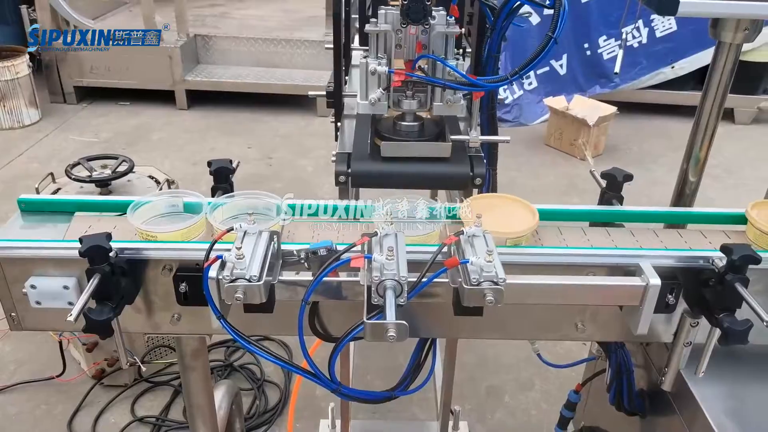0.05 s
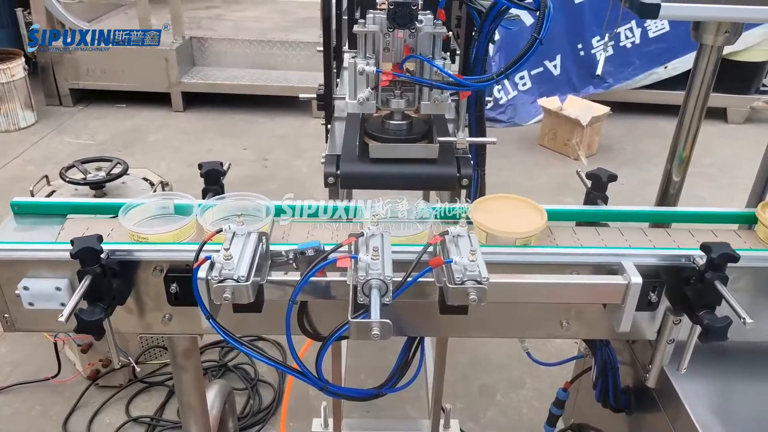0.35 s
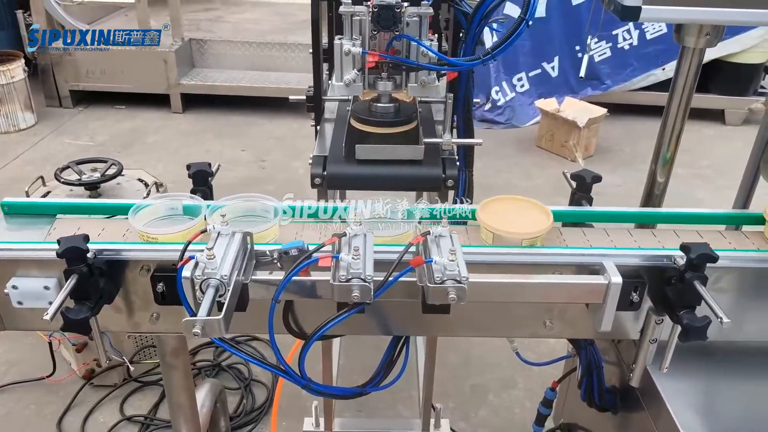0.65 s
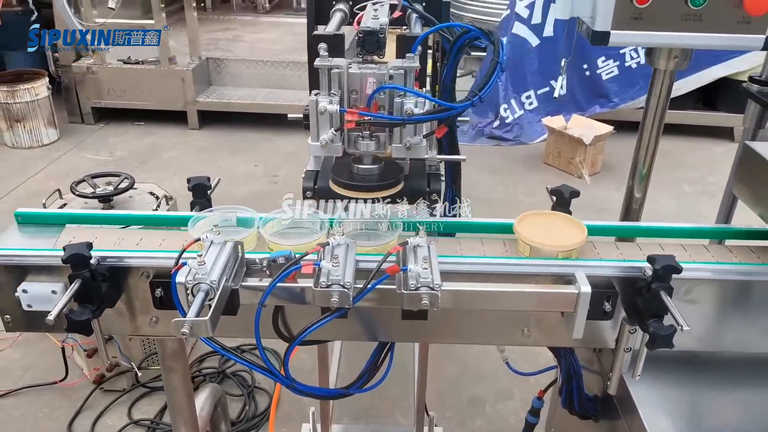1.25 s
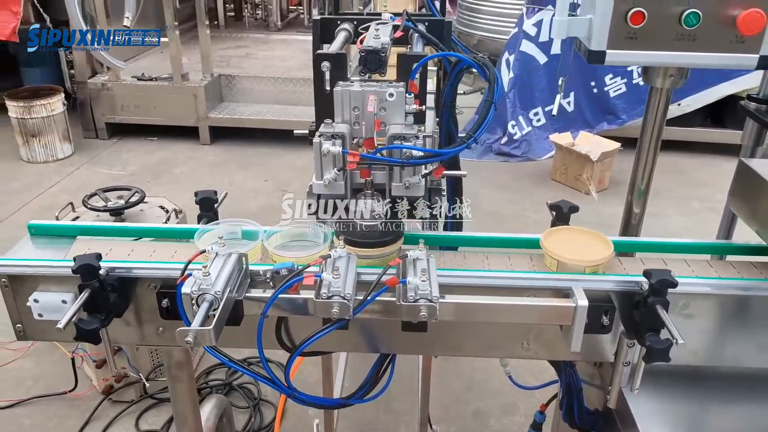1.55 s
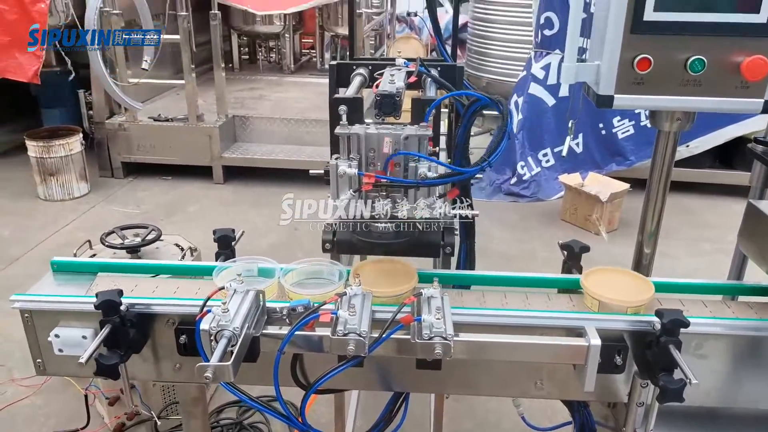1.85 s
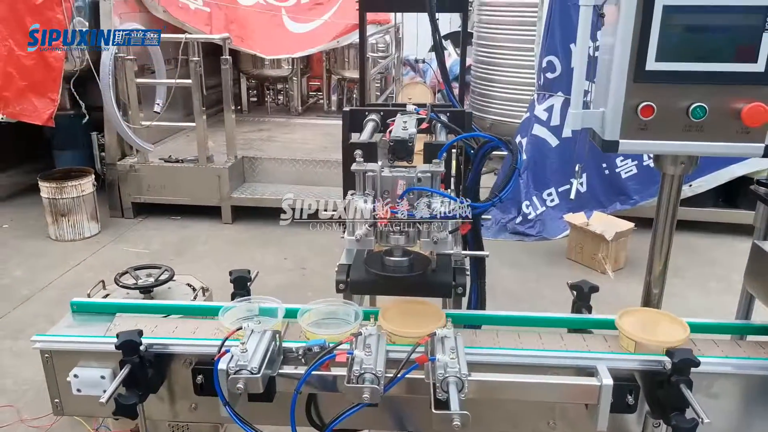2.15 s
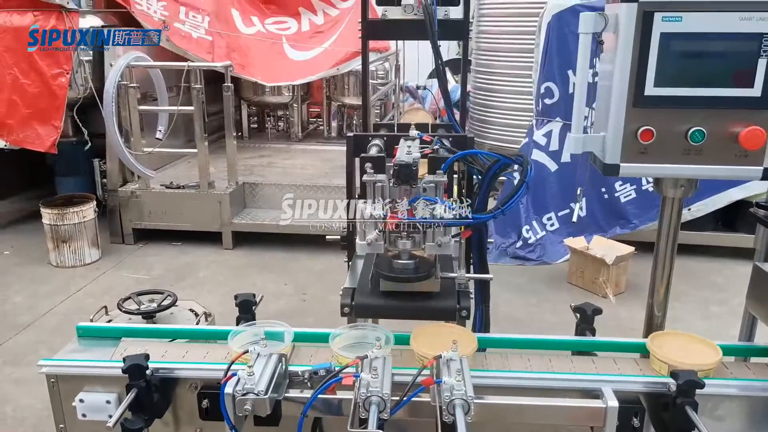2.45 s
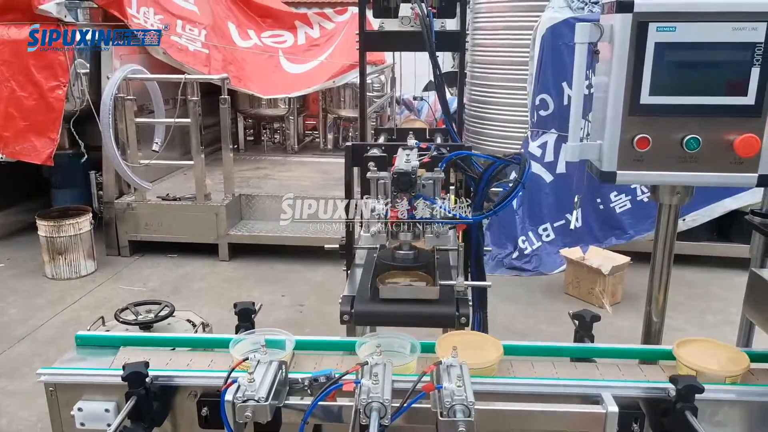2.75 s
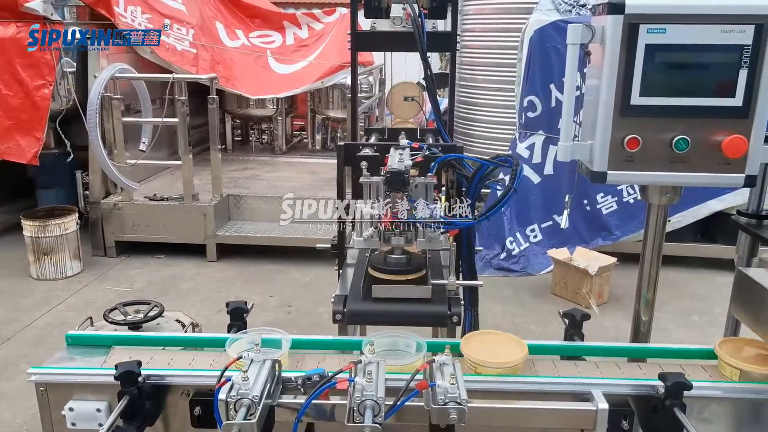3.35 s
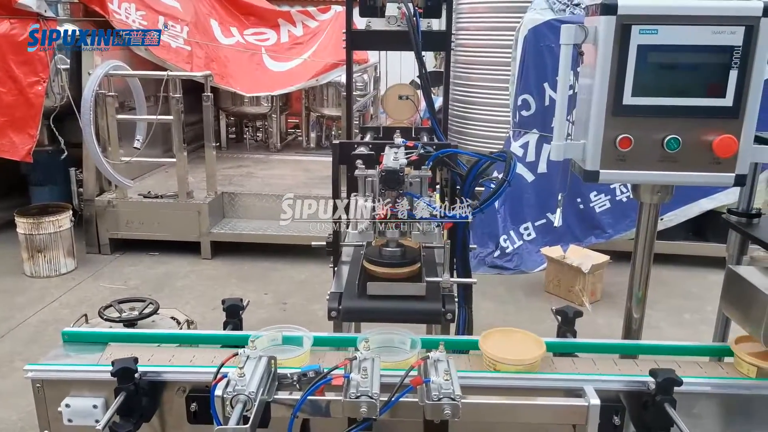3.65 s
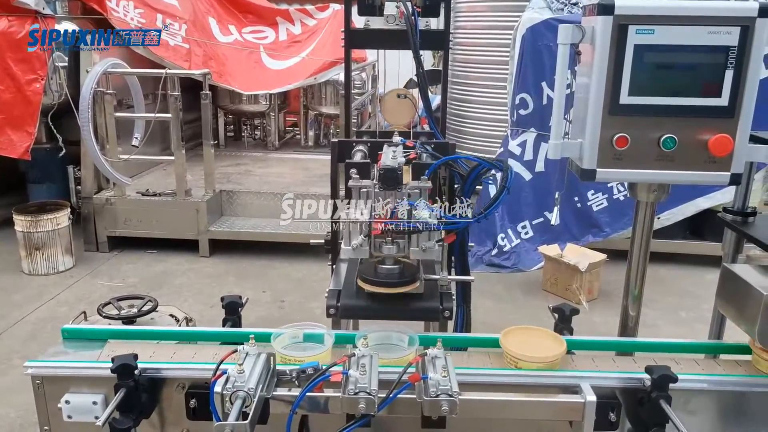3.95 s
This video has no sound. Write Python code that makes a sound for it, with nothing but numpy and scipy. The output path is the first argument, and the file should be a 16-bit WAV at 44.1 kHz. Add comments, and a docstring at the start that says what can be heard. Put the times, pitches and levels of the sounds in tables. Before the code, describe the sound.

A pneumatic capping machine clacks in irregular clusters, its pistons ringing the steel frame while cups and lids tick and slides scrape. Air hisses, valves puff and a conveyor rumbles underneath, heard in a workshop from a hand-held microphone.

```python
"""Pneumatic capping machine

Cylinders clack against their stops and excite the modes of a steel frame; cups and lids knock and tick,
and slides scrape by stick-slip friction. Leaking air hisses as a turbulent jet, briefly shut off by a
valve, and the valves vent in whistling puffs. The conveyor drive rumbles underneath.
The workshop is heard from a hand-held stereo microphone."""
import sys
import numpy as np
from scipy import signal
from scipy.fft import rfft, irfft
from scipy.io import wavfile

SR = 44100
rng = np.random.default_rng(int(sys.argv[2]) if len(sys.argv) > 2 else 0)


def unload_audio(sound):
    """Save the sound as a 16-bit wav file, at the path given as the first command line argument."""
    columns = np.transpose(np.atleast_2d(sound))
    # keep every value between -1 and 1, then stretch to whole-number steps
    steps = np.round(np.clip(columns, -1, 1) * 32767)
    wavfile.write(sys.argv[1], SR, steps.astype(np.int16))


N = 176400
T = np.arange(N) / SR


def amp(db):
    """Amplitude ratio of a level in decibels."""
    return 10 ** (np.asarray(db) / 20)

def curve(points):
    """Gain over time, interpolated in level between points (t/s, level/dB)."""
    return amp(np.interp(T, *np.array(points).T))

def swell(start, attack, hold, release):
    """Envelope: linear rise, plateau, then exponential decay with time constant release; all in s."""
    age = T - start
    return np.clip(age / attack, 0, 1) * np.exp(-np.clip((age - attack - hold) / release, 0, 40))

def noise(shared):
    """Partially coherent stereo white noise; shared is the fraction of power common to both channels."""
    n = rng.standard_normal((3, N))
    return np.sqrt(shared) * n[0] + np.sqrt(1 - shared) * n[1:]

def flutter(rate):
    """Random modulation of about unit deviation, with rate new values a second."""
    return np.interp(T * rate, np.arange(8192), rng.standard_normal(8192)) * np.sqrt(1.5)

def wandering_phase(depth, rate):
    """Frequency modulation: the phase of a 1 Hz tone whose pitch strays by the fraction depth."""
    return 2 * np.pi * np.cumsum(1 + depth * flutter(rate)) / SR

def colour(x, points):
    """Minimum-phase filter through points (f/Hz, level/dB), made by folding the cepstrum."""
    hz, db = np.array(points).T
    bins_hz = np.maximum(np.fft.rfftfreq(2 * N, 1 / SR), 1)
    cepstrum = irfft(np.log(amp(np.interp(np.log(bins_hz), np.log(hz), db))))
    cepstrum[1:N] *= 2
    cepstrum[N + 1:] = 0
    return irfft(rfft(x, 2 * N) * np.exp(rfft(cepstrum)))[..., :N]

def lowpass(x, hz, order=4):
    """Zero-phase low-pass filter."""
    return signal.sosfiltfilt(signal.butter(order, hz, fs=SR, output="sos"), x)

def resonance(x, hz, width_hz):
    """Second-order resonator with unit gain at its centre."""
    return signal.lfilter(*signal.iirpeak(hz, hz / min(width_hz, SR / 3), fs=SR), x)

def reflect(x, t60, db, shared):
    """Reverberation: convolution with decaying noise adds reflections at about constant total power."""
    response = noise(shared) * swell(0.0028, 0.0011, 0, t60 / np.log(1000))
    response /= np.sqrt((response ** 2).sum(1, keepdims=True))
    reflections = signal.fftconvolve(x, response, axes=1)[:, :N]
    return (x + amp(db) * reflections) / np.sqrt(1 + amp(db) ** 2)

def ring(modes, strikes, detune, focus_db, contact_s=0.00098, scatter_db=-0.5):
    """Modal superposition: the place of a strike favours one frequency, by focus_db over an octave."""
    out, t = np.zeros((2, 2 * N)), T[:SR // 2]
    hz, db, t60 = np.array(modes).T[:, :, None]
    for start, strike_db, focus_hz, t60_factor in strikes:
        tune, size, phase, skew = rng.standard_normal((4, len(modes), 1))
        octaves_off = np.minimum(abs(np.log2(hz / focus_hz)), 1)
        strength = amp(strike_db + db - focus_db * octaves_off)
        envelope = strength * np.exp(-np.log(1000) * t / (t60 * t60_factor))
        envelope *= 1 - np.exp(-t / contact_s)
        struck_hz = hz + detune * tune * np.minimum(hz, 2000)
        left = envelope * amp(scatter_db * size) * np.exp(1j * np.pi * (2 * struck_hz * t + phase))
        right = left * np.exp(1j * skew * np.minimum(hz / 1500, 1))  # low modes stay nearly in phase
        pair = np.array([left.imag.sum(0), right.imag.sum(0)])
        i = int(start * SR)
        out[:, i:i + len(t)] += pair * np.sqrt((envelope ** 2).sum() / (pair ** 2).sum())
    return out[:, :N]


# piston impacts: t/s, crack level/dB, crack decay/s, frame level/dB, gate level/dB, favoured f/Hz
PISTON_BLOWS = [(.002, -22.5, 0.019, -28.5, -43, 646), (.05, -45, .0073, -33.5, -58, 383),
                (.512, -10, 0.0074, -20.5, -15.5, 350), (0.585, -10.5, .008, -21, -30, 560),
                (.602, -23.5, .005, -30, -26, 540), (1.213, -19.5, 0.012, -33, -52, 540),
                (1.227, -22, 0.015, -27, -55, 500), (1.246, -17.5, .012, -28, -53, 443),
                (1.347, -14, 0.0031, -33, -50, 417), (1.377, -23, 0.011, -32.5, -47, 390),
                (1.413, -14, 0.0048, -27.5, -28, 700), (1.434, -17.5, 0.019, -23, -31, 426),
                (1.530, -26.5, 0.0023, -31.5, -58, 373), (1.582, -60, .011, -31, -60, 397),
                (1.678, -25, 0.014, -34, -34.5, 219), (1.789, -32, .0061, -25.5, -49, 427),
                (1.797, -17, 0.0041, -26, -25.5, 393), (2.093, -15, 0.03, -23.5, -19.5, 370),
                (2.168, -15, 0.0095, -28, -18, 626), (2.193, -20, 0.0077, -29, -32, 490),
                (2.321, -24, 0.0097, -35, -30, 690), (2.339, -16, 0.0052, -26.5, -53, 466),
                (2.751, -16, .004, -41, -35, 593), (2.789, -19, 0.0071, -24.5, -50, 494),
                (2.844, -13.5, 0.003, -35, -41, 700), (2.918, -13.5, 0.0082, -20.5, -35, 650),
                (2.946, -22, 0.0051, -34, -24, 704), (3.279, -16, 0.0034, -47, -33, 1280),
                (3.298, -17, 0.024, -33, -46, 1310), (3.415, -17.5, 0.022, -22, -16.5, 423),
                (3.487, -11.5, .0075, -22, -20, 510)]
# spectrum of the contact noise: f/Hz, level/dB
CRACK_SPECTRUM = [(60, -50), (250, 4), (450, -2), (1000, -3), (2600, 0.5), (4000, -9.5), (6000, -10.5),
                  (9000, -11.5), (16000, -18)]
# modes of the steel frame and of the gate: f/Hz, level/dB, T60/s
FRAME_MODES = [(183.9, -17, 1), (247, -7.5, .14), (340.7, -9, 0.33), (376.6, -4, 0.35), (433.3, -2.5, 0.29),
               (467.6, -3.5, 0.34), (530, -22, 0.086), (601.4, -4, 0.28), (756, 4.5, 0.066),
               (1184, -3, 0.21), (1760, -21, 0.12), (2350, 0.5, 0.13)]
GATE_MODES = [(941, 0, 0.047), (952, 6, 0.022), (964, -16, 0.072), (1234, -12.5, 0.072), (2837, -2, 0.02)]

def cylinders():
    """Impact excitation: pistons crack against their stops, ring the rattling frame and knock the gate."""
    force = sum(amp(db) * swell(t, 0.0038, 0.0015, decay) for t, db, decay, *_ in PISTON_BLOWS)
    crack = colour(noise(shared=0.83) * force * amp(0.65 * flutter(660)), CRACK_SPECTRUM)
    frame_strikes = [(t, db, hz, 1) for t, _, _, db, _, hz in PISTON_BLOWS]
    gate_strikes = [(t, db, hz, 1) for t, _, _, _, db, hz in PISTON_BLOWS]
    frame = ring(FRAME_MODES, frame_strikes, detune=0.0376, focus_db=12)
    gate = ring(GATE_MODES, gate_strikes, detune=0.0188, focus_db=0)
    crack = reflect(crack, t60=0.063, db=-5, shared=0.32)
    rattle = amp(4.5 * np.tanh(flutter(160)))
    return crack + frame * rattle + gate


# modes of the steel stop rods: f/Hz, level/dB, T60/s
ROD_MODES = [(5200, -4, 0.14), (6100, -10, 0.069), (7030, -0.5, 0.23), (7260, -4.5, 0.11),
             (8840, -4.5, 0.27), (9180, 1, 0.12), (9230, -13, .06), (10700, -6.5, 0.15), (11800, -5.5, .1),
             (13300, -1, .08), (14330, -3, .08)]
# strikes on the rods: t/s, level/dB, favoured f/Hz, factor on T60
ROD_STRIKES = [(0.513, -18, 9200, 0.54), (0.587, -17.5, 5470, 0.61), (2.097, -21.5, 8000, 1.6),
               (2.171, -8.5, 5000, 0.11), (3.238, -4.5, 5030, 0.065), (3.414, -20.5, 7400, 0.48),
               (3.488, -18, 6950, 0.76)]

def stop_rods():
    """Free vibration of struck rods; being loose, they buzz with a fast amplitude modulation."""
    pings = ring(ROD_MODES, ROD_STRIKES, detune=0.0077, focus_db=19)
    buzz = amp(6 * np.tanh(flutter(400)) + flutter(89.5))
    return pings * buzz


# knocks of the press on cups and lids: t/s, level/dB, hold/s, release/s, f/Hz
CUP_KNOCKS = [(0.53, -24, .008, 0.02, 396.4), (1.22, -27.5, 0.016, .014, 593),
              (1.243, -29, .004, 0.048, 440), (1.38, -25.5, .02, .012, 423.8),
              (1.785, -29, 0.0032, 0.0067, 478), (1.806, -27, .005, .02, 409.6),
              (2.336, -16.5, 0.0034, 0.0069, 473)]

def cup_knocks(overtone_ratio=2.7, overtone_db=-26):
    """Damped oscillation: cups and lids answer the press with a hollow note and an inharmonic overtone."""
    phase, out = wandering_phase(depth=0.0356, rate=120), 0
    for t, db, hold, release, hz in CUP_KNOCKS:
        note = np.sin(hz * phase) + amp(overtone_db) * np.sin(overtone_ratio * hz * phase)
        out += amp(db) * swell(t, 0.002, hold, release) * note
    return out


# light contacts of cups, lids and valves: t/s, level/dB, decay/s, centre f/Hz, bandwidth/centre
LIGHT_CONTACTS = [(.003, -9, 0.0015, 4000, 0.82), (0.025, -11, 0.0018, 4200, 0.61),
                  (0.028, -9.5, 0.0025, 4840, 0.3), (0.0962, -9, 0.0015, 3570, 0.7),
                  (0.237, 0, 0.0064, 1246, 0.12), (.239, -8.5, 0.013, 2040, 0.42),
                  (0.291, -22, 0.017, 4140, 2.2), (0.336, -6.5, 0.0011, 5100, 0.14),
                  (.379, -13, 0.0049, 3600, 1.2), (2.172, -10, 0.0036, 7760, 0.086),
                  (2.842, -3.5, 0.011, 1620, 0.28), (2.921, -5, .003, 4970, 0.18),
                  (2.948, -4, 0.002, 5100, 0.49), (2.972, -6, 0.0024, 1930, 1.34),
                  (2.989, -13.5, 0.0021, 3060, 0.79), (3.013, -34, 0.0028, 3500, 1.1),
                  (3.183, -18, 0.04, 2100, 0.45), (3.191, -8.5, 0.012, 4600, 0.096),
                  (3.239, -9, 0.001, 4600, 0.58), (3.239, -3, 0.0034, 1970, 0.11),
                  (3.504, -20, 0.016, 12900, 0.57)]

def ticks(tail_db=-46, tail_s=0.024):
    """Resonant filtering gives each short snap of noise, and its faint tail, a pitch of its own."""
    excitation, out = noise(shared=0.48), 0
    for t, db, decay, hz, bandwidth in LIGHT_CONTACTS:
        envelope = swell(t, 0.000072, 0.00024, decay) + amp(tail_db) * swell(t, 0.0018, 0, tail_s)
        snap = resonance(excitation * amp(db) * envelope, hz, hz * bandwidth)
        out += resonance(snap, hz, 2 * hz * bandwidth)
    return out


# strokes of the slides and guide rods: t/s, level/dB, hold/s, release/s
SLIDE_STROKES = [(0.005, -31, 0.031, 0.019), (0.352, -34.5, 0.14, 0.025), (0.52, -29.5, 0.02, 0.012),
                 (1.192, -32.5, 0.042, 0.063), (1.34, -37.5, 0.11, 0.035), (2.093, -35.5, 0.081, 0.056),
                 (2.757, -24.5, 0.021, 0.016), (2.794, -22.5, 0.031, 0.017), (2.876, -29.5, 0.069, 0.077),
                 (3.31, -35.5, 0.075, 0.061), (3.406, -33.5, 0.032, 0.014)]
# spectrum of the friction noise: f/Hz, level/dB
FRICTION_SPECTRUM = [(150, 1), (500, -4.5), (1000, 2), (1400, -2), (2000, 5.5), (2500, 9), (2900, 2.5),
                     (3500, -6), (5200, -2.5), (8000, -10), (16000, -15)]

def slides():
    """Stick-slip friction makes a grainy noise, in which a narrow resonance squeaks."""
    grip = sum(amp(db) * swell(t, 0.023, hold, release) for t, db, hold, release in SLIDE_STROKES)
    grains = noise(shared=0.46) * amp(5.4 * np.tanh(flutter(500)) + 1.5)
    rub = colour(grains * grip, FRICTION_SPECTRUM)
    squeak = resonance(rub, hz=2683, width_hz=51)
    return reflect(rub + squeak, t60=0.03, db=5.5, shared=0.79)


# spectrum of the leaking jet: f/Hz, level/dB
LEAK_SPECTRUM = [(200, -42), (900, -14), (1500, -11.5), (1850, -7.5), (2200, -4.5), (2900, -2),
                 (3450, -2.5), (4050, -0.5), (5500, -0.5), (6500, 1), (7300, 0.5), (10800, 0.5),
                 (13000, -2), (16000, -4.5)]
# resonances of the leaking fittings: f/Hz, bandwidth/Hz, level/dB
FITTING_MODES = [(2210, 110, -4), (2570, 47, -4.5), (2996, 110, -0.5), (4320, 54, -6), (5030, 250, -1),
                 (5500, 110, -1), (8300, 190, -8), (9300, 250, -11), (11160, 240, -5)]
# course of the whole hiss, of its lower part and of its whistling band: t/s, level/dB
LEAK_FLOW = [(0, -26), (.7, -25), (1.0, -27.5), (1.45, -26.5), (1.5, -39.5), (1.57, -45.5), (1.668, -49),
             (1.676, -27), (2.0, -24.5), (2.45, -28.5), (2.75, -26.5), (3.6, -27), (4, -28)]
LEAK_LOWS = [(0, 4.5), (2.0, 5.5), (2.45, -0.5), (2.7, 2), (3.0, 2.5), (4, 5)]
LEAK_WHISTLE = [(0, -4), (1.8, 0), (2.25, 2), (2.55, 5.5), (2.9, -14), (3.7, 0)]

def leak(full_flow_db=-21.5, dulling_exponent=0.63):
    """Turbulent jet noise excites the fittings; as the pressure falls, it loses its treble first."""
    jet, flow = colour(noise(shared=0.023), LEAK_SPECTRUM), curve(LEAK_FLOW)
    whistle = curve(LEAK_WHISTLE) * resonance(jet, hz=3970, width_hz=300)
    fittings = sum(amp(db + 2.5 * flutter(3.43)) * resonance(jet, hz, width)
                   for hz, width, db in FITTING_MODES)
    hiss = jet + whistle + fittings
    hiss += (curve(LEAK_LOWS) - 1) * lowpass(hiss, hz=3030)
    dull = lowpass(hiss, hz=6500)
    treble_gain = np.minimum(flow / amp(full_flow_db), 1) ** dulling_exponent
    hiss = dull + (hiss - dull) * treble_gain
    gain = flow * amp(-4 + 0.39 * flutter(25.84))
    return reflect(hiss * gain, t60=0.0088, db=-4, shared=0.052)


# air vented by the valves: t/s, level/dB, hold/s, release/s
VALVE_PUFFS = [(0.264, -22.5, 0.026, 0.025), (0.38, -22.5, 0.016, 0.1), (1.245, -17.5, 0.021, 0.075),
               (1.35, -33, 0.045, .015), (1.682, -13, 0.021, 0.09), (1.781, -18.5, 0.02, 0.02),
               (1.934, -21, 0.018, 0.026), (2.761, -25, 0.043, 0.033), (3.273, -20, 0.011, 0.024)]
# spectrum of the exhaust jet: f/Hz, level/dB
EXHAUST_SPECTRUM = [(200, -10), (700, -16.5), (1200, -3), (1450, -26), (1900, -8), (2350, -7), (2900, -4),
                    (3300, -7.5), (4500, -9.5), (5400, -1.5), (6200, -10), (7500, -9), (11000, -10.5),
                    (16000, -13)]
# whistling resonances of the exhaust: f/Hz, bandwidth/Hz, level/dB
EXHAUST_MODES = [(4235, 5.9, 17.5), (4430, 43, 7), (4692, 33, 7.5), (5600, 16, -6.5), (6070, 24, 11),
                 (6130, 38, 8), (6689, 16, 8)]

def exhaust():
    """Transient jets from the valves whistle at the resonances of the metal around them."""
    jet = colour(noise(shared=0.13), EXHAUST_SPECTRUM)
    whistles = sum(amp(db) * resonance(jet, hz, width) for hz, width, db in EXHAUST_MODES)
    puffs = sum(amp(db) * swell(t, 0.011, hold, release) for t, db, hold, release in VALVE_PUFFS)
    return reflect((jet + whistles) * puffs, t60=0.037, db=-6.5, shared=0.086)


# partials of the pressing head's drone: f/Hz, level/dB
HEAD_PARTIALS = [(124, -47), (182, -35.5), (365, -50), (545, -60), (722, -43.5)]

def pressing_head():
    """Amplitude and frequency modulation make the head's drone uneven as it lifts."""
    phase = wandering_phase(depth=0.0141, rate=25)
    drone = sum(amp(db + 3.9 * flutter(29.93)) * np.sin(hz * phase) for hz, db in HEAD_PARTIALS)
    return drone * swell(start=1.68, attack=0.019, hold=0.078, release=0.34)


# shudders of the stand: t/s, level/dB, hold/s, release/s, f/Hz
STAND_SHUDDERS = [(0.075, -22, 0.12, 0.016, 62.2), (0.383, -20.5, 0.053, 0.033, 60),
                  (0.663, -33.5, 0.24, 0.047, 62), (1.158, -25.5, 0.024, 0.036, 50),
                  (1.241, -19.5, 0.0054, 0.0065, 118.8), (1.27, -27.5, 0.053, 0.037, 62.66),
                  (1.434, -16.5, 0.0023, 0.0057, 115.7), (1.683, -21.5, 0.0045, 0.021, 98),
                  (1.932, -20.5, 0.0092, 0.053, 52.5), (1.935, -29, 0.057, 0.022, 106.4),
                  (2.132, -25, 0.084, 0.029, 48.7), (2.574, -19.5, 0.0038, 0.0081, 51.6),
                  (2.778, -24.5, 0.0037, 0.014, 105.4), (3.292, -28.5, 0.068, 0.027, 58),
                  (3.779, -27, 0.021, 0.013, 50)]

def stand():
    """Damped low-frequency vibration: the strokes briefly shake the stand."""
    phase = wandering_phase(depth=0.0866, rate=30)
    return sum(amp(db) * swell(t, 0.0017, hold, release) * np.sin(hz * phase)
               for t, db, hold, release, hz in STAND_SHUDDERS)


# spectra of the conveyor drive and of the rolling press carriage: f/Hz, level/dB
DRIVE_SPECTRUM = [(15, -8), (30, -2), (48, -2), (70, -7), (110, -12), (170, -24), (260, -27), (420, -31),
                  (800, -36.5), (1500, -45), (4000, -66), (16000, -63)]
CARRIAGE_SPECTRUM = [(80, -5.5), (170, -3), (250, -9.5), (330, -11), (420, -6.5), (560, -15), (740, -15),
                     (1000, -19), (1400, -25), (4000, -41), (16000, -50)]
# course of the same two noises: t/s, level/dB
DRIVE_LEVEL = [(0, -2), (1, -7), (2, -9), (2.5, -3.5), (3.1, -11.5), (3.6, -6.5), (4, -5.5)]
CARRIAGE_LEVEL = [(0, -15), (.25, -24), (.65, -15), (.85, -31.5), (1.2, -31), (1.3, -11), (1.65, -25),
                  (1.72, -11), (2.2, -12.5), (2.58, -23), (2.66, -26), (3.0, -15), (3.15, -22.5),
                  (3.55, -14), (3.75, -28), (4, -43)]

def conveyor():
    """Random vibration, strongest in the bass: the drive rumbles and the carriage rolls."""
    drive = colour(noise(shared=0.89), DRIVE_SPECTRUM) * amp(1.55 * flutter(12))
    carriage = colour(noise(shared=0.87), CARRIAGE_SPECTRUM) * amp(3.1 * flutter(40.6))
    return drive * curve(DRIVE_LEVEL) + carriage * curve(CARRIAGE_LEVEL)


def scene():
    """Superposition of the sources; the impacts and scrapes reverberate in the workshop."""
    strokes = cylinders() + stop_rods() + cup_knocks() + ticks() + slides()
    strokes_in_room = reflect(strokes, t60=0.35, db=-12.5, shared=0.95)
    return strokes_in_room + leak() + exhaust() + conveyor() + stand() + pressing_head()


# treble of the left channel as the microphone is moved: t/s, level/dB
LEFT_TREBLE = [(0, -4.5), (1.0, -3.5), (2.0, -2), (2.7, 0), (3.1, 0.5), (4, 2)]
# response of the right microphone port: f/Hz, level/dB
PORT_RESPONSE = [(20, -3), (1300, -1), (2000, -2), (2800, 9.5), (4000, 9), (6400, 10), (7300, -1.5),
                 (8200, -2.5), (11000, -3), (16000, -8.5)]

def record(dry, cutoff_hz=15750):
    """Microphone response: the left side brightens as it moves, the right port resonates, the top is cut."""
    bass = lowpass(dry[0], hz=1400, order=2)
    left = bass + (dry[0] - bass) * curve(LEFT_TREBLE)
    right = colour(dry[1], PORT_RESPONSE)
    band_limit = signal.ellip(10, 0.2, 80, cutoff_hz, fs=SR, output="sos")
    return signal.sosfilt(band_limit, np.array([left, right]))


dry = scene()
out = record(dry)
unload_audio(out)
```